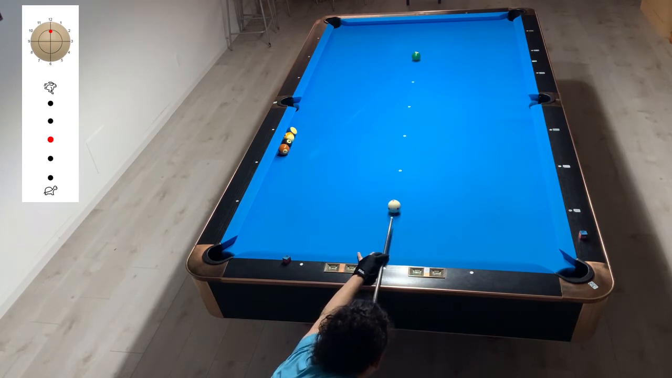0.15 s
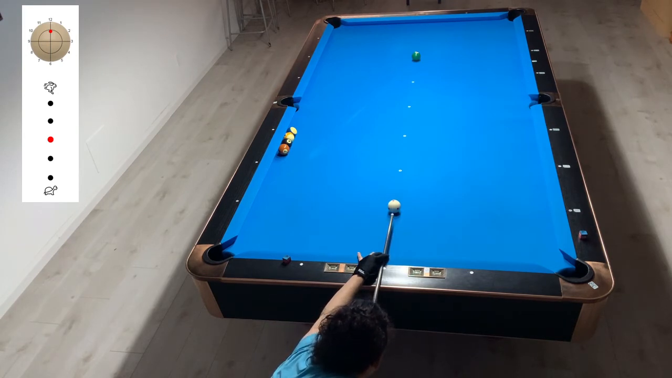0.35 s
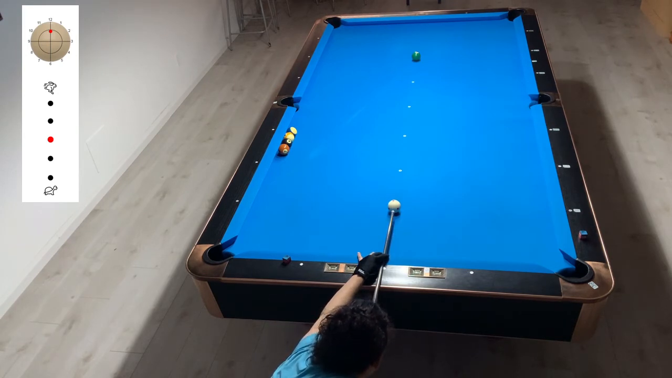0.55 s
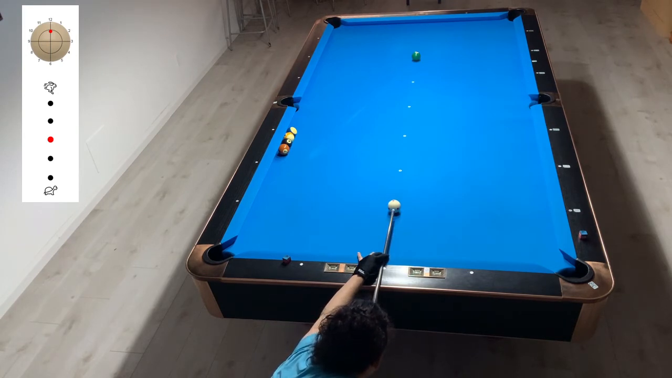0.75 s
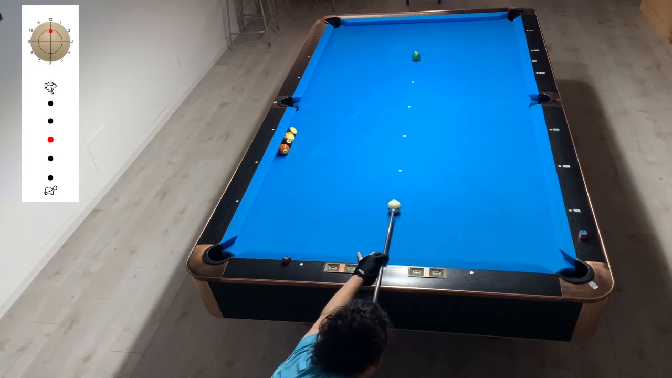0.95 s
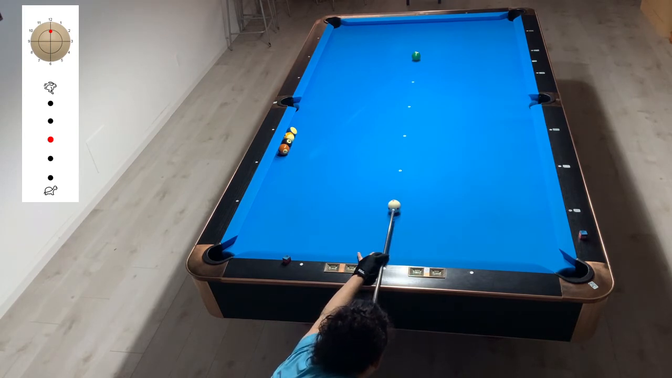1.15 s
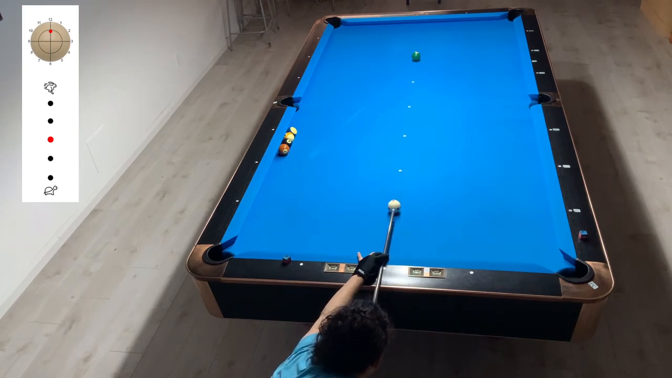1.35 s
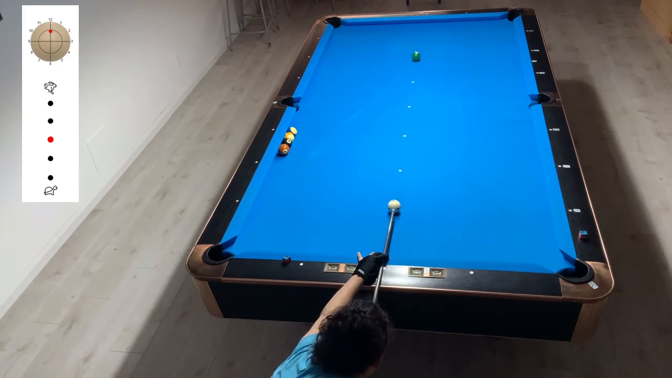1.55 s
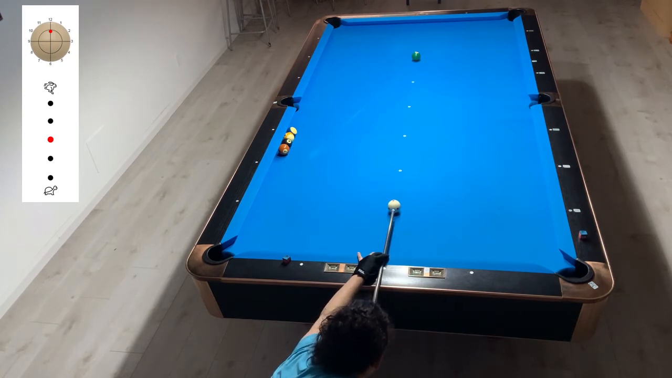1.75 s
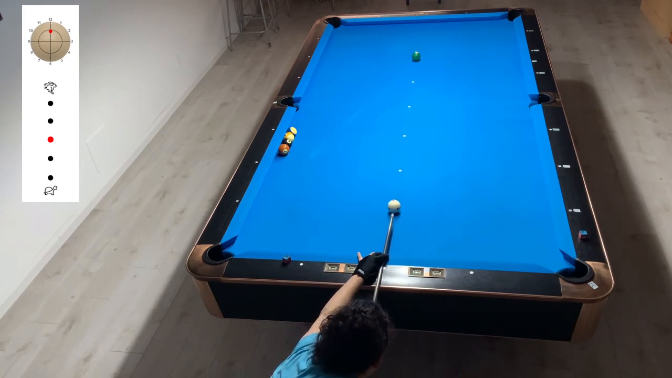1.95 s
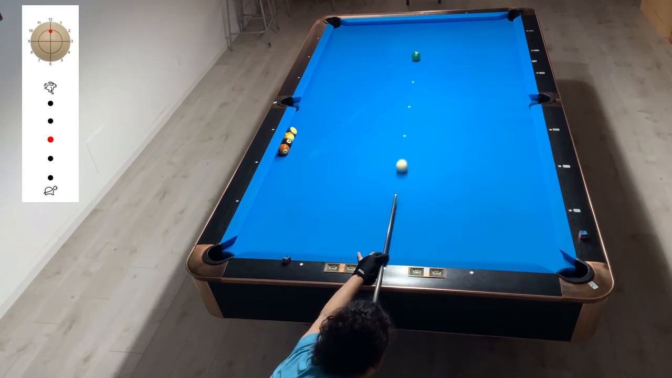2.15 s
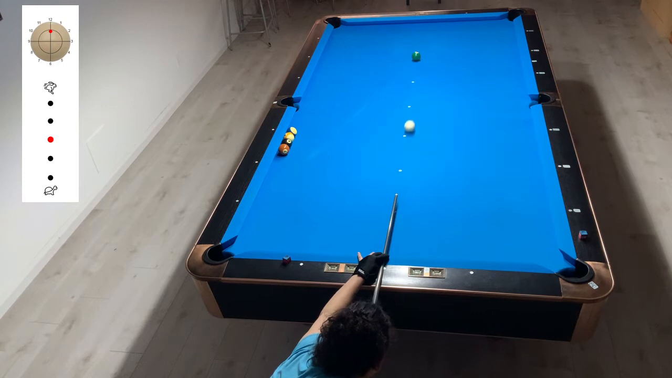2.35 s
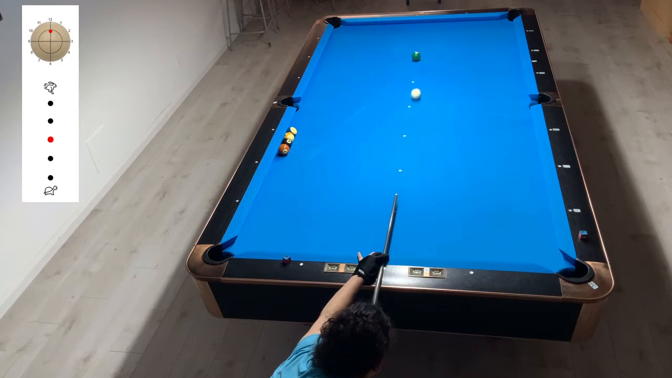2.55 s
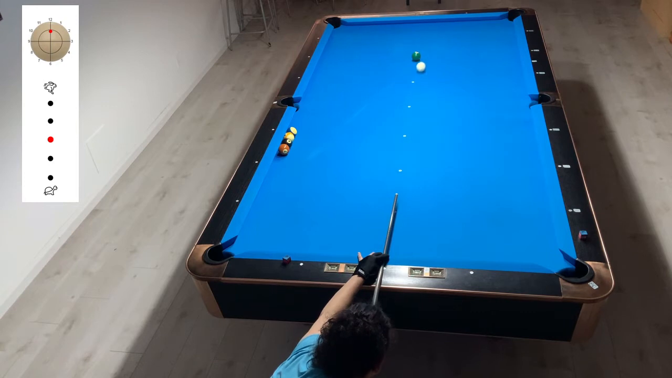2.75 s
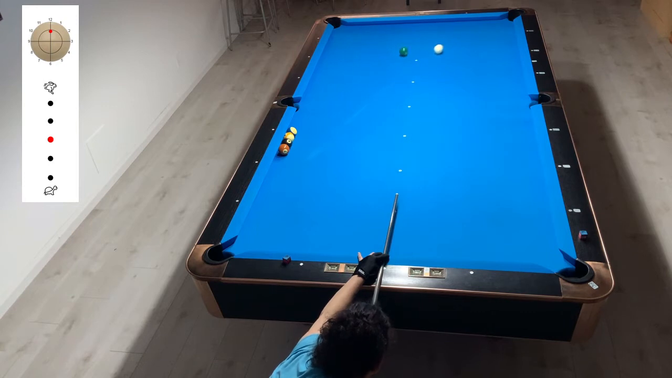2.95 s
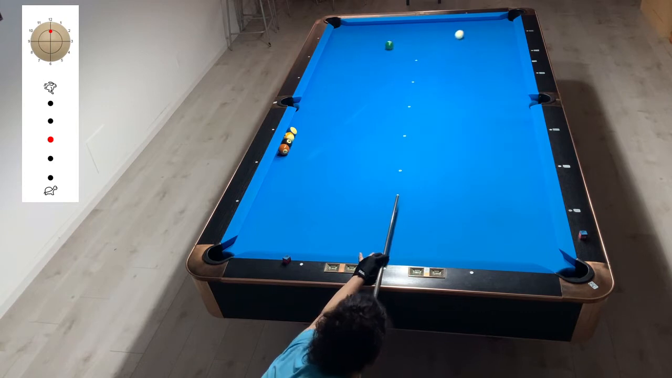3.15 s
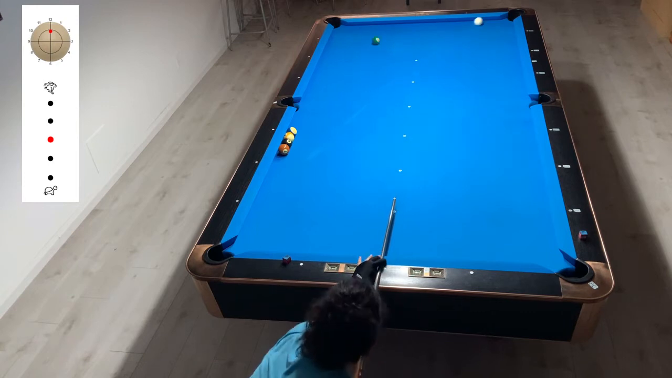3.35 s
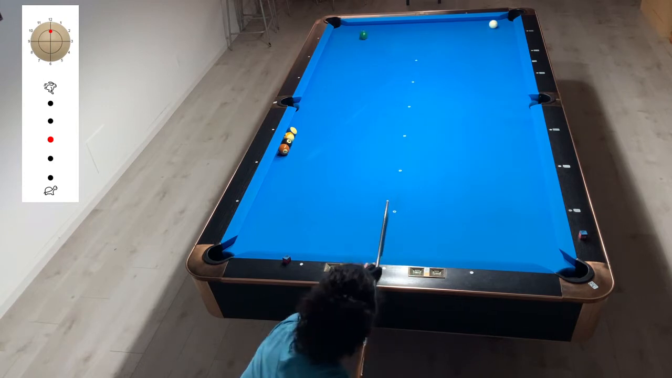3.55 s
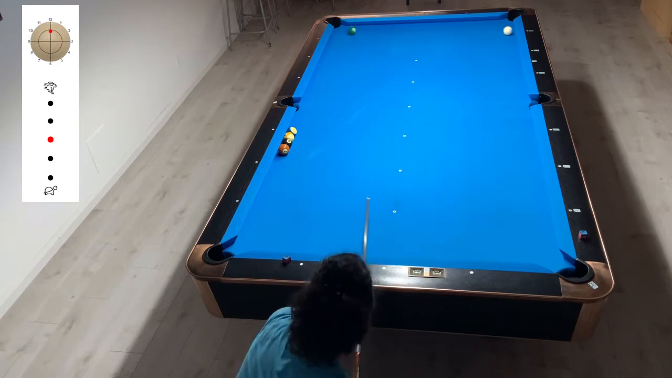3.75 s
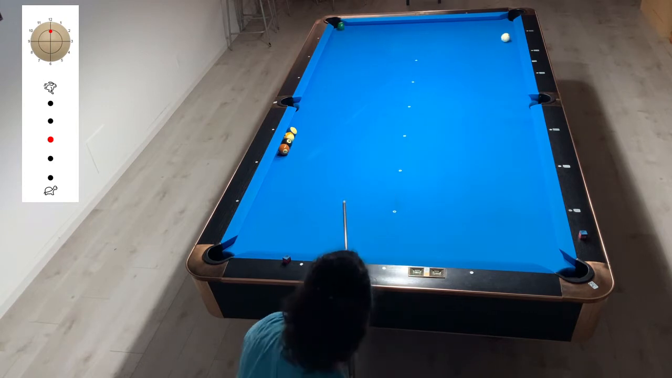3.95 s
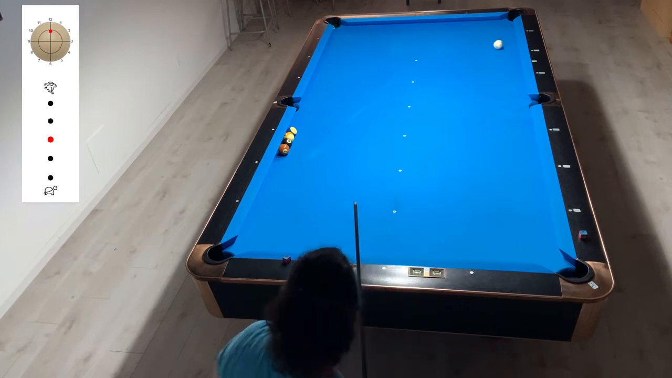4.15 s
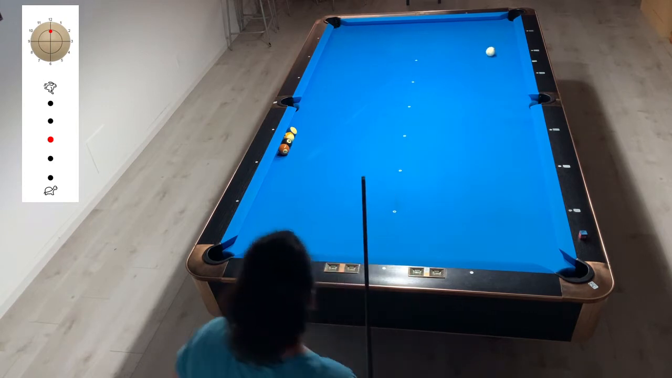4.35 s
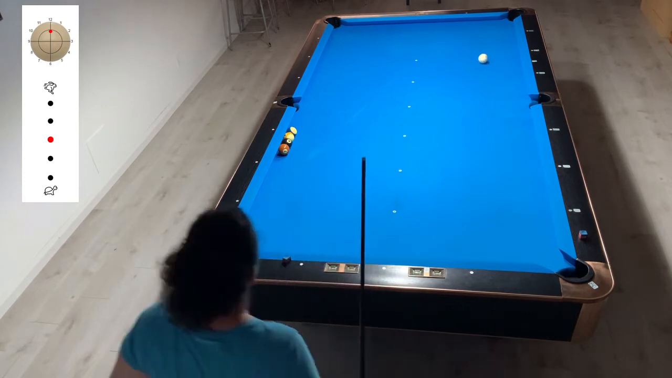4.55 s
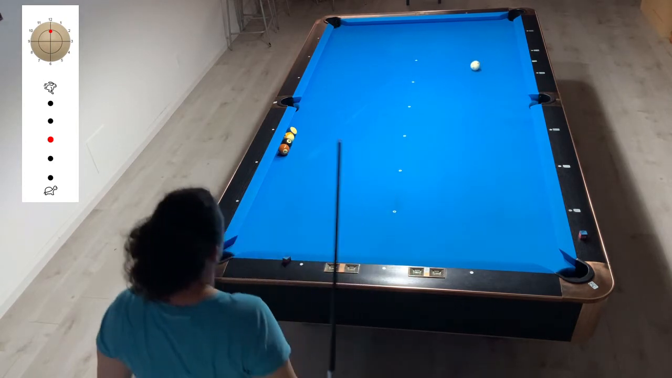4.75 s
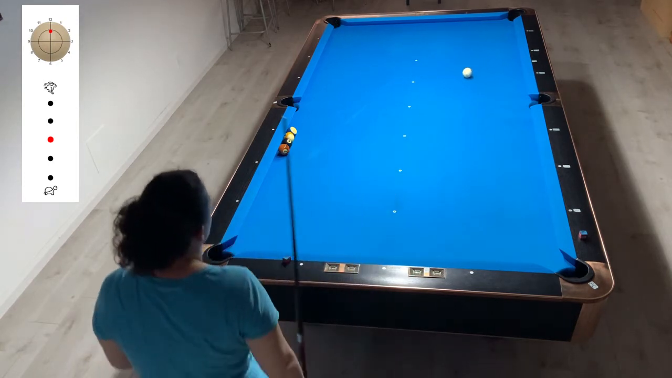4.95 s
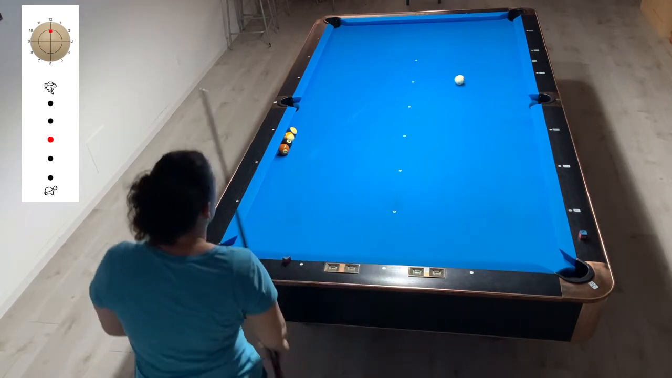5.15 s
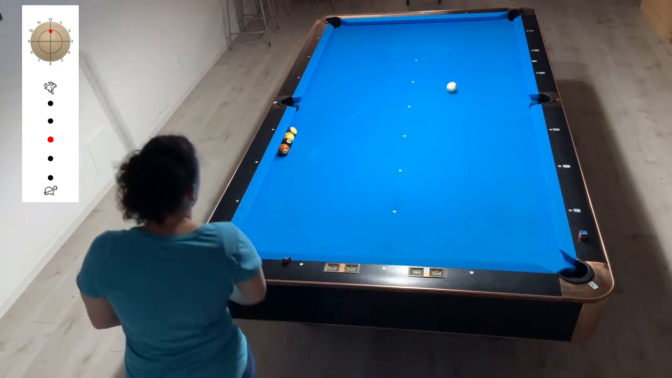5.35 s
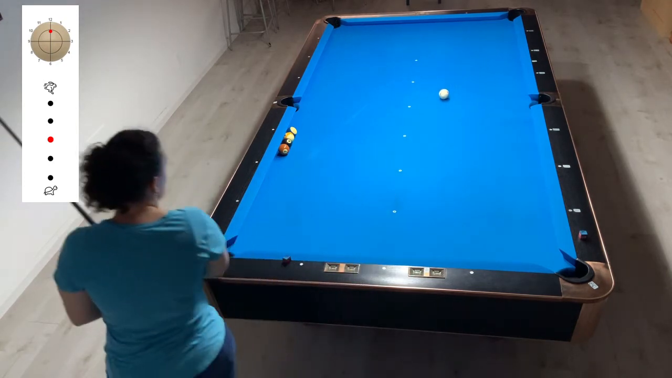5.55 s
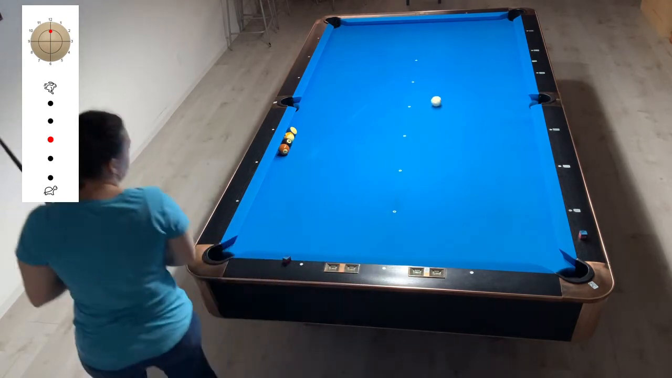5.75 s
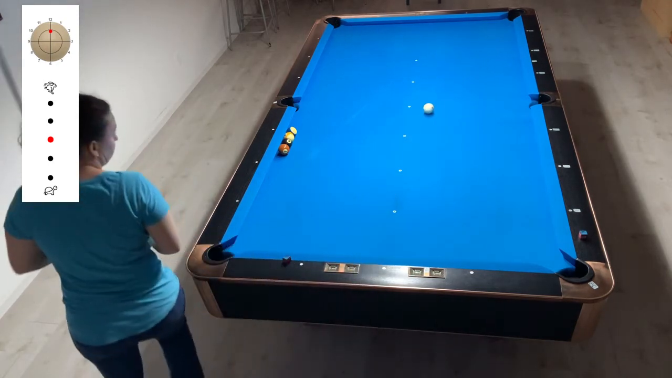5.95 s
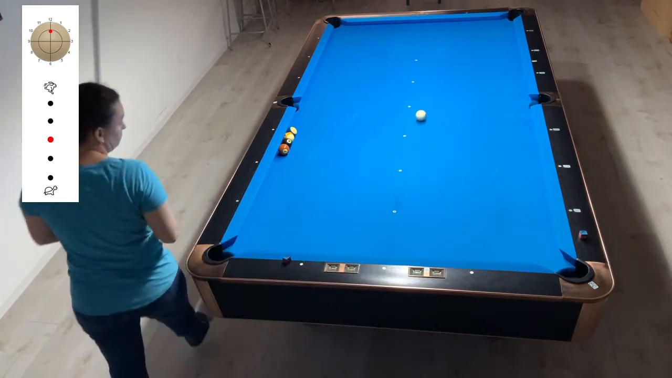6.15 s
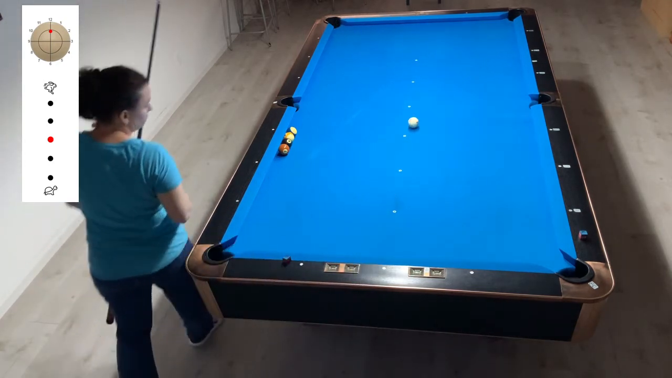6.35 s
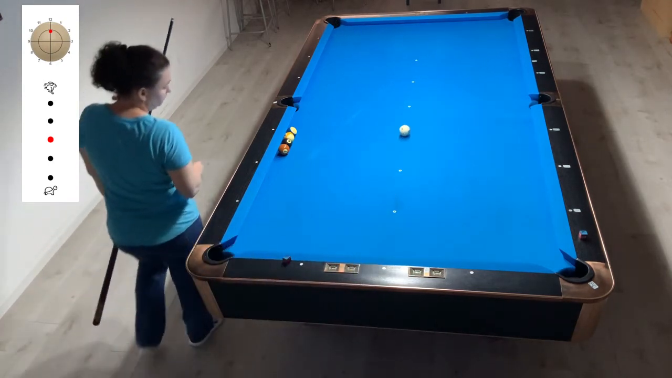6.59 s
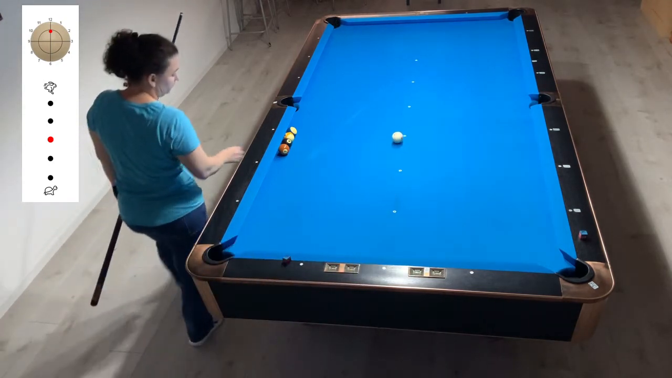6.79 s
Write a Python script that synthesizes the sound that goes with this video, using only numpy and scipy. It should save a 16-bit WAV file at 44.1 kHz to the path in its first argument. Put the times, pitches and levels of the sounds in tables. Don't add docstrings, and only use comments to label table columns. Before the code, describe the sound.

A bare hard-walled room with low, soft air tone and faint hiss, heard by close stereo microphones. For the first two seconds only barely audible cloth and glove rubs. At 2.02 a loud, short woody cue knock, tip tick and shaft ringing briefly, with a low table hum beneath. At 2.87 a hard, clean ball-on-ball click, farther away, with quick wall reflections and a short tail. Faint rumble and rustle follow, with a weak dull bump near 3.45 and a small rub and squeak around 3.8-4.1. From 4.26 to 4.7 a ball drops: irregular rapid clacks, bright pings and hollow wooden knocks around mid-low pitch, strongest near 4.3 and 4.51, over a heavy low hum. Then sparse muffled bumps, a light knock at 5.37, a tiny bright snap at 5.65, and a brief low squeak at 6.22, amid clothing rustle and shoe scuffs until about 6.9.

```python
import sys
import numpy as np
from scipy import signal
from scipy.fft import rfft, irfft, next_fast_len
from scipy.io import wavfile
from scipy.ndimage import uniform_filter1d

SR = 44100
rng = np.random.default_rng(int(sys.argv[2]) if len(sys.argv) > 2 else 0)


def ratio(d):
    e = np.asarray(d, float) / 20
    return 10 ** e


def int16_out(signal):
    q = np.round(np.clip(np.atleast_2d(signal).T, -1, 1) * 32767)
    wavfile.write(sys.argv[1], SR, q.astype(np.int16))


N = 300894

# (frequency [Hz], level per Hz [dB])
AIR = [(18, -51.5), (34, -14.5), (54, -0.5), (75, -0.5), (92, -11.5), (122, -3.5), (283, -14), (318, -17),
       (441, -10.5), (507, -17.5), (672, -13), (1100, -26), (2060, -35.5), (8000, -61.5), (10400, -75),
       (17600, -120)]
AIR_DB, HISS_DB = -61.5, -85.5

# (delay [s], level [dB])
ECHOES = [(.0042, -6), (.0072, -6), (.0092, -21.5), (0.0123, -8), (0.0168, -27), (0.0285, -35.5),
          (.0288, -23), (.033, -13)]
# (delay [s], level [dB])
FAR_ECHOES = [(.0042, -1), (.0072, -5), (.0092, -3), (0.0118, -7), (0.0262, -15), (0.0291, -12),
              (0.034, -11), (.0358, -11), (.0585, -15), (.062, -13)]
FAR_WALL_S, FAR_WALL_DB = 0.016, -0.5
# (frequency [Hz], t60 [s])
HALL_T60 = [(150, 1.2), (500, 0.53), (1700, 0.72), (2700, 0.53), (3900, 0.55), (5400, 0.52), (9000, 0.28),
            (14000, 0.21)]
# (frequency [Hz], likeness [0-1])
PORT_LIKENESS = [(60, 0.87), (200, 0.92), (400, 0.56), (800, 0.2), (2000, 0.029), (6000, 0.06),
                 (7600, 0.12), (9650, 0.19), (11500, 0.18), (13000, 0.7)]
# (frequency [Hz], share of left copied into right [0-1])
COPIED = [(6000, 0), (8000, .5), (9100, .85), (9650, .97), (10200, .85), (11500, .3), (13000, .8),
          (15000, .5)]
PORT_LAG = 6.85

# (frequency [Hz], width [Hz], level [dB])
BED_MODES = [(115.7, 6.7, 8), (147.8, 6.6, 3.5), (180, 12, -2), (199.1, 3.9, -9.5), (253, 36, -13)]
# (start [s], length [s], level [dB], frequency [Hz])
HUMS = [(2.061, 0.15, -37.9, 66.1), (2.04, 0.34, -35.5, 60.6), (2.203, 0.26, -46.5, 69.5),
        (2.493, 0.25, -38, 63.6), (2.776, 0.17, -41.5, 68.5), (2.883, 0.4, -36.5, 66.14),
        (2.897, 0.23, -40.5, 60.15), (3.31, 0.17, -47, 65.6), (3.454, 0.43, -46, 66.03),
        (3.46, 0.73, -57, 60.7), (3.914, 0.24, -57.8, 69.8), (4.298, 0.52, -33, 59.46),
        (4.38, 0.43, -41, 70.3), (4.85, 0.29, -45.5, 58.65), (4.851, 0.36, -51.5, 71.5),
        (5.33, 0.41, -54.5, 68.56), (5.469, 0.33, -50, 60.46), (5.618, 0.34, -54, 66.7),
        (5.971, 0.29, -51.5, 68.5), (6.078, 0.33, -57, 60.2), (6.441, 0.26, -50, 67.6),
        (6.533, 0.27, -54.5, 58.6), (2.52, 0.11, -46, 59.3), (3.15, 0.091, -35, 64),
        (3.56, 0.13, -49, 61.8), (3.72, 0.12, -64, 70)]
HUM_RISE_S, HUM_FALL_S, HUM_SAG_DB = 0.053, 0.051, -4.5
# (time [s], second mode [dB], upper modes [dB])
JOLTS = [(2.037, -44.5, -40), (2.32, -61.5, -58), (2.559, -57, -61), (2.88, -49.5, -43), (3.2, -65, -54.5),
         (3.449, -49, -49.5), (3.8, -61, -56.5), (4.298, -30.5, -29.5), (4.55, -38.5, -65),
         (4.72, -47, -48.5), (5.37, -57, -49), (5.5, -58, -62), (6.05, -63, -77), (6.26, -64, -66),
         (6.56, -60, -62)]
SECOND_HZ = 96.7
JOLT_RISE_S, SECOND_T60_S, UPPER_T60_S = 0.019, 0.99, 1

# (frequency [Hz], level [dB])
RUMBLE = [(200, -22.5), (350, -6), (520, -3.5), (750, -6.5), (1100, -11)]
SCUFF = [(700, -18.5), (1200, 5), (2300, -0.5), (3200, -9), (4200, -15)]
RUSTLE = [(2800, 1.5), (4000, 0), (5000, -2), (6500, -6), (8500, -16.5)]
SWISH = [(6000, -9), (8000, 3), (10000, 7.5), (13500, -1.5), (15300, -1), (16000, -5)]
# (time [s], level over stillness [dB])
BUSY = [(0, 0.5), (2.0, 1.5), (2.302, 0.5), (3.3, 7.5), (3.5, 8.5), (4.2, 6), (4.75, 10.5), (4.9, 10),
        (5.55, 10), (5.82, 7), (6.1, 12.5), (6.5, 6), (6.82, 7.5)]
# (start [s], length [s], strength [dB], brightness [dB], share spent swelling [0-1])
MOVES = [(0.412, 0.26, -73.5, 2.5, 0.19), (1.1, 0.11, -77, 4, 0.26), (1.40, 0.33, -75, 0.5, 0.22),
         (1.87, 0.35, -65.5, 5.5, 0.7), (2.42, 0.25, -73, -5, 0.26), (3.298, 0.28, -74, 5.5, 0.72),
         (3.798, 0.31, -65.5, 9.5, 0.68), (4.046, 0.52, -63.5, 5, 0.05), (4.902, 0.34, -62, 2, 0.3),
         (4.98, 0.4, -64.5, 2.5, 0.33), (5.315, 0.09, -70, 6.5, 0.3), (5.375, 0.26, -66, -3, 0.46),
         (5.466, 0.31, -62.5, 2.5, 0.38), (5.637, 0.26, -62.5, 5, 0), (5.842, 0.25, -66, 2.5, 0.4),
         (5.983, 0.43, -62.5, 1.5, 0.23), (6.116, 0.34, -65.5, 3.5, 0.44), (6.297, 0.31, -68, 6, 0.22),
         (6.538, 0.38, -62, 1.5, 0.28)]
STILL_DB = (-74.5, -84, -90.5, -100)
BUSY_SHARE = (1.145, 1.33, .8, 1.64)
MOVE_DB = (-8, -1.5, -14, -33)
BRIGHT_SHARE = (-2, 0, 1.5, 3.5)
SHARPNESS = (0.93, 0.94, 1, 2)
# (start [s], length [s], level [dB], frequency [Hz])
RUBS = [
    (0.425, 0.087, -81, 4600),
    (1.415, 0.14, -75.5, 2270),
    (2.392, 0.17, -72.5, 2390),
    (3.839, 0.25, -65, 2860),
    (4.074, 0.037, -53.5, 1660),
    (5.377, 0.12, -61.5, 2720),
    (5.889, 0.42, -74, 4800),
    (6.219, 0.036, -60, 1800),
    (6.56, 0.067, -74, 3420),
]
RUB_WIDTH = 0.069

# (time [s], peak [dB], room send [dB])
SNAPS = [
    (5.637, -60, 10),
    (5.649, -49, 0),
    (6.427, -74, -13),
]
# (frequency [Hz], level [dB])
SNAP_TICK = [(1000, -46), (2900, 8), (3600, -9), (4400, 4), (6000, -11), (9000, -7), (12000, -8),
             (15300, -8.5), (16000, -19.5)]

# (time [s], box [dB], thud [dB], pitch factor [ratio])
BUMPS = [(3.450, -64, -44.5, 0.87), (3.767, -59, -60, 0.72), (4.268, -44, -37, 0.93),
         (4.308, -26.5, -44, 0.99), (4.385, -40.5, -34, 1.05), (4.455, -41, -32, 1.11),
         (4.522, -33, -36, 1.01), (4.599, -46, -53, 0.85), (5.0564, -54, -58, 0.9),
         (5.411, -48.5, -48, 0.76), (5.5506, -42, -60, 0.845), (5.5974, -49.5, -64, 0.71),
         (5.8559, -51.5, -72, 0.96), (5.93, -53.5, -65, 0.96), (6.0657, -48.5, -58, 0.95),
         (6.2225, -56, -52, 0.81)]
# (time [s], peak [dB], frequency [Hz], t60 [s])
PLANKS = [(4.262, -36.5, 626, 0.096), (4.262, -35.5, 430, 0.11), (4.336, -29, 570, 0.065),
          (4.340, -28, 376, 0.062), (4.325, -37, 452, .08), (4.380, -33.5, 444, 0.083),
          (4.402, -39.5, 392, 0.036), (4.452, -37, 557, .08), (4.485, -41, 400, 0.041),
          (4.548, -34.5, 537, 0.072), (4.562, -43, 430, .07), (4.588, -38, 496, 0.06),
          (4.636, -37, 534, 0.04), (4.675, -43, 436, 0.029), (4.72, -48, 505, 0.038),
          (4.30, -44, 680, 0.029), (4.306, -24.5, 534, .09), (4.518, -27.5, 538, 0.11),
          (4.345, -30.5, 148, .06), (3.455, -54, 386, 0.093), (3.48, -49.5, 227, 0.11),
          (3.51, -52.5, 310, .12)]
# (time [s], peak [dB], frequency [Hz], t60
# [s])
PINGS = [(4.089, -54.5, 1610, 0.018), (4.2585, -41.5, 1990, 0.026), (4.2956, -33.5, 1236, .02),
         (4.2956, -34, 2680, .018), (4.3215, -37, 2890, 0.017), (4.348, -33, 1220, 0.014),
         (4.348, -45, 2480, 0.013), (4.5118, -31, 2630, 0.021), (4.5125, -40, 3780, 0.01),
         (4.5125, -35.5, 2000, 0.01), (4.563, -43, 2600, 0.029), (4.577, -42, 2700, .025),
         (4.580, -41, 1243, 0.032), (4.639, -40, 1970, 0.013), (4.666, -50, 2670, 0.024),
         (5.370, -48.5, 3790, 0.01), (5.370, -53, 2600, .015), (2.8715, -26.5, 2700, 0.029)]
PING_RISE_S, PLANK_RISE_S = 0.00039, 0.0038
# (frequency [Hz], level [dB], t60 [s])
BOX_MODES = [(407, -19.5, 0.074), (466, -3.5, 0.05), (520, 5.5, 0.038), (637, -34, 0.05)]
# (time [s], rap [dB], clack [dB], box [dB], thud [dB])
KNOCKS = [(4.09, -72.5, -44.5, -64, -82), (4.2593, -38, -43, -38, -45.5), (4.2952, -30.5, -37, -34.5, -56),
          (4.324, -68, -27.5, -38, -58), (4.348, -34.5, -35, -47, -12), (4.414, -48, -34.5, -39.5, -42),
          (4.5121, -43.5, -21.5, -39.5, -33.5), (4.575, -75, -39, -43, -58),
          (4.6373, -67, -31, -45.5, -36.5), (4.68, -77, -41, -50.5, -52), (5.3703, -69, -38, -48.5, -62)]
# (frequency [Hz], level [dB])
RAP_TICK = [(700, -4.5), (1300, 1.5), (1600, -3), (2300, -3), (3400, -14.5), (6000, -19), (9600, -17),
            (13200, -25), (15700, -28)]
CLACK_TICK = [(600, -7), (900, -3), (1260, 1), (1550, -2), (1800, 2.5), (2700, -1), (3100, -5), (3900, -11),
              (5000, -25), (8000, -37)]
THUD_TICK = [(90, -2), (130, 3), (200, -3.5), (330, -5), (600, -3)]

# (time [s], peak [dB], room send [dB])
BALLS = [
    (2.8658, -13.5, -7),
]
# (frequency [Hz], level [dB])
BALL_TICK = [(250, -25.5), (383, -7), (560, -17.5), (1100, -6.5), (2170, 1), (2900, -3.5), (3600, -12.5),
             (4300, -28), (4650, -38.5), (6100, -35.5), (7500, -63), (15700, -47)]
# (time [s], peak [dB], room send [dB])
BALL_RING = [
    (2.866, -42, -2),
]
# (frequency [Hz], level [dB], t60 [s])
BALL_MODES = [(8360, -11, 0.014), (10840, -6, 0.01), (11670, -10, 0.0095), (12960, -7, .012),
              (13800, 0, 0.008), (14400, -4, 0.015), (15100, 0, 0.011)]

# (time [s], peak [dB], room send [dB])
CUE = [
    (2.0191, -13.5, -15.5),
]
# (frequency [Hz], level [dB], t60 [s])
CUE_MODES = [(363, 1, 0.045), (569, -1, 0.062), (764, 2.5, 0.054), (1114, 7.5, 0.03), (1133, 1.5, 0.046),
             (1316, 2.5, 0.052), (1740, -10.5, 0.16), (1916, -1.5, 0.067), (1894, -8, 0.025),
             (2276, -6, 0.095), (2700, -3.5, 0.044), (2847, 4.5, 0.02), (3240, -6, 0.025),
             (3460, -7, 0.017)]
# (time [s], peak [dB], room send [dB])
TIP = [
    (2.02, -21.5, 1.24),
]
# (frequency [Hz], level [dB])
TIP_TICK = [(260, 2.5), (500, 5.5), (800, -2), (1150, 2), (1500, -8), (1750, 2), (2200, -5.5), (2680, -2.5),
            (3100, -15.5), (3700, -19.5), (4500, -23), (7000, -25), (12500, -16), (15700, -36)]


def evened(x):
    return x / np.sqrt(np.mean(x ** 2) + 1e-20)


def read(points, hz):
    f, value = np.transpose(points)
    return np.interp(np.log(hz + 1), np.log(f + 1), value)


def edged(points):
    return [(points[0][0] / 2, -70)] + list(points) + [(points[-1][0] * 2, -70)]


def add(mix, s, sound):
    part = mix[round(s * SR):][:len(sound)]
    part += sound[:len(part)]


def tick(points, size=4096):
    hz = abs(np.fft.fftfreq(size, 1 / SR))
    log_gain = np.log(ratio(read(edged(points), hz)))
    pulse = np.fft.ifft(np.exp(np.conj(signal.hilbert(log_gain)))).real[:size // 2]
    return pulse / abs(pulse).max()


def ring(modes, rise):
    t = np.arange(SR // 4) / SR
    y = sum(ratio(db - 60 * t / t60) * np.sin(2 * np.pi * hz * t) for hz, db, t60 in modes)
    y = y * (1 - np.exp(-t / rise))
    return y / abs(y).max()


def ring_each(rows, rise):
    out = np.zeros(N)
    for s, db, hz, t60 in rows:
        add(out, s, ratio(db) * ring([(hz, 0, t60)], rise))
    return out


def strike(times, levels_db, sound, chatter=0):
    train = np.zeros(N)
    np.add.at(train, np.round(np.asarray(times) * SR).astype(int), ratio(levels_db))
    trail = signal.lfilter([0, chatter], [1, -np.exp(-1 / (SR * 0.0037))], train)
    trail = trail * rng.standard_normal(N)
    return signal.oaconvolve(train + trail, sound)[:N]


def contact(times, levels_db, room_db, sound, chatter=0):
    direct = strike(times, levels_db, sound, chatter)
    return np.array([direct, strike(times, levels_db + room_db, sound)])


def noise(points, patchy_db=0, size=512):
    hz = np.fft.rfftfreq(size, 1 / SR)
    a, b, c, d, patch = rng.standard_normal((N // (size // 4) + 5, len(hz), 5)).T
    patch = uniform_filter1d(patch, size=7, axis=0)
    patch = evened(uniform_filter1d(patch, size=14, axis=1))
    gain = ratio(read(points, hz)[:, None] + patchy_db * patch)
    z = np.array([a + 1j * b, c + 1j * d]) * gain
    return evened(signal.istft(z, nperseg=size, noverlap=size * 3 // 4)[1][:, :N])


def port_turn(count):
    return 2 * np.pi * np.fft.rfftfreq(count) * PORT_LAG


def spread(pair):
    count = pair.shape[1]
    size = next_fast_len(count)
    left, other = rfft(pair, size, axis=1)
    same = np.clip(read(PORT_LIKENESS, np.fft.rfftfreq(size, 1 / SR)), 0, 1)
    trail = np.exp(-1j * np.minimum(port_turn(size), 2 * np.pi))
    right = trail * same * left + np.sqrt(1 - same ** 2) * other
    return irfft([left, right], size, axis=1)[:, :count]


def echoes(x, table):
    taps = np.zeros((2, SR // 10))
    taps[:, 0] = 1
    for k, (s, db) in enumerate(table):
        shift = min(k, 1) * rng.integers(-5, 6, 2)
        taps[[0, 1], round(s * SR) + shift] = ratio(db) * rng.uniform(0.7, 1, 2)
    return signal.oaconvolve(x[None], taps, axes=1)[:, :N]


def hall(x, build=0.0032):
    taps = np.zeros((2, SR))
    slots = np.arange(0, SR - 16, 16)
    at = slots + rng.integers(0, 16, (2, len(slots)))
    np.put_along_axis(taps, at, rng.choice([-1., 1.], at.shape), 1)
    hz, t, z = signal.stft(spread(taps), SR, nperseg=128)
    decay = ratio(-60 * t / read(HALL_T60, hz)[:, None])
    tail = signal.istft(z * decay, SR, nperseg=128)[1][:, :SR]
    tail = tail * (1 - np.exp(-(np.arange(SR) / SR / build) ** 2))
    tail = ratio(6.0) * tail / np.linalg.norm(tail[0])
    return signal.fftconvolve(x[None], tail, axes=1)[:, :N]


def still_air():
    return ratio(AIR_DB) * noise(AIR, patchy_db=3.0, size=4096)


def hiss():
    colour = [(3000, -5.5), (6000, 2.0), (10000, 4.5), (13500, -1.0), (15700, -3.0)]
    return ratio(HISS_DB) * noise(colour)


def bed_hum():
    hum = np.zeros(N)
    for s, length, db, hz in HUMS:
        u = np.arange(0, length + HUM_FALL_S, 1 / SR)
        edge = np.clip(np.minimum(u / HUM_RISE_S, (length + HUM_FALL_S - u) / HUM_FALL_S), 0, 1)
        level = ratio(db + HUM_SAG_DB * u / length) * np.sin(np.pi / 2 * edge) ** 2
        add(hum, s, level * np.sqrt(2) * np.sin(2 * np.pi * hz * u))
    return hum


def jolt_level(times, levels_db, t60):
    u = np.arange(SR) / SR
    swell = (1 - np.exp(-(u / JOLT_RISE_S) ** 2)) * 1000 ** (-u / t60)
    return np.sqrt(abs(strike(times, 2 * levels_db, swell ** 2)))


def bed_jolts():
    s, second_db, upper_db = np.transpose(JOLTS)
    tone = np.sqrt(2) * np.sin(2 * np.pi * SECOND_HZ * np.arange(N) / SR)
    second = jolt_level(s, second_db, SECOND_T60_S) * tone
    size = next_fast_len(N)
    hz = np.fft.rfftfreq(size, 1 / SR)
    shape = sum(ratio(db) / (1 + (2 * (hz - mode_hz) / width) ** 2) for mode_hz, width, db in BED_MODES)
    resonant = irfft(rfft(rng.standard_normal((2, size))) * shape, size)[:, :N]
    return second + jolt_level(s, upper_db, UPPER_T60_S) * evened(spread(resonant))


def stir():
    busy_db = np.interp(np.arange(N) / SR, *np.transpose(BUSY))
    power = ratio(np.array(STILL_DB)[:, None] + np.outer(BUSY_SHARE, busy_db)) ** 2
    for s, length, db, bright_db, peak in MOVES:
        peak = np.clip(peak, 0.05, 0.95)
        u = np.arange(0, 1, 1 / (length * SR))
        swell = np.sin(np.pi / 2 * np.minimum(u / peak, (1 - u) / (1 - peak))) ** 2
        levels_db = db + np.array(MOVE_DB) + np.array(BRIGHT_SHARE) * bright_db
        for layer, sharp, layer_db in zip(power, SHARPNESS, levels_db):
            add(layer, s, (ratio(layer_db) * swell ** sharp) ** 2)
    layers = (noise(edged(RUMBLE), patchy_db=3), noise(edged(SCUFF), patchy_db=1.5),
              noise(edged(RUSTLE), patchy_db=1.2), noise(edged(SWISH), patchy_db=1.2))
    return sum(np.sqrt(level) * layer for level, layer in zip(power, layers))


def rubs():
    out = np.zeros((2, N))
    for s, length, db, hz in RUBS:
        edges = [hz * (1 - RUB_WIDTH), hz * (1 + RUB_WIDTH)]
        band = signal.butter(2, edges, "band", fs=SR, output="sos")
        swell = np.hanning(round(length * SR))
        rub = evened(signal.sosfilt(band, rng.standard_normal((2, SR // 2))))[:, :len(swell)]
        add(out.T, s, (ratio(db) * swell * rub).T)
    return out


def snaps():
    return contact(*np.transpose(SNAPS), tick(SNAP_TICK), 0.3)


def return_bumps():
    dull, thud = np.zeros(N), tick(THUD_TICK)
    for s, box_db, thud_db, pitch in BUMPS:
        box = ring([(hz * pitch, db, t60) for hz, db, t60 in BOX_MODES], rise=0.0065)
        add(dull, s, ratio(box_db) * box)
        add(dull, s, ratio(thud_db) * thud)
    return np.array([dull, ratio(-8.5) * dull])


def return_planks():
    return ring_each(PLANKS, PLANK_RISE_S)


def bright_pings():
    pings = ring_each(PINGS, PING_RISE_S)
    return np.array([pings, ratio(-11.5) * pings])


def pocket_knocks():
    s, rap_db, clack_db, box_db, thud_db = np.transpose(KNOCKS)
    return (contact(s, rap_db, 9.5, -tick(RAP_TICK), 0.2)
            + contact(s, clack_db, -1.5, tick(CLACK_TICK), 0.07)
            + contact(s, box_db, 0, ring(BOX_MODES, rise=0.0021))
            + contact(s, thud_db, -21, tick(THUD_TICK)))


def ball_ring():
    return contact(*np.transpose(BALL_RING), ring(BALL_MODES, rise=0.0005))


def ball_click():
    s, db, room_db = np.transpose(BALLS)
    click = tick(BALL_TICK)
    direct, sent = contact(s, db, room_db, click)
    return direct, sent + strike(s + FAR_WALL_S, db + FAR_WALL_DB, click)


def cue_shot():
    shaft = contact(*np.transpose(CUE), ring(CUE_MODES, rise=0.003))
    return shaft + contact(*np.transpose(TIP), tick(TIP_TICK), 0.15)


def blows():
    near, near_sent = (snaps() + return_bumps() + bright_pings() + pocket_knocks()
                       + ball_ring() + cue_shot())
    far, far_sent = ball_click()
    planks = return_planks()
    tail = hall(near_sent + far_sent + ratio(-14.0) * planks)
    planks_left_of_centre = planks * ratio([[1.5], [-1.5]])
    return echoes(near, ECHOES) + echoes(far, FAR_ECHOES) + tail + planks_left_of_centre


def scene():
    diffuse = spread(still_air() + hiss() + stir() + rubs())
    return diffuse + bed_hum() + bed_jolts() + blows()


def shared_treble(pair):
    size = next_fast_len(N)
    left, right = rfft(pair, size, axis=1)
    copied = np.clip(read(COPIED, np.fft.rfftfreq(size, 1 / SR)), 0, 1)
    trail = np.exp(-1j * np.maximum(port_turn(size) - 2 * np.pi, 0))
    late_right = irfft((copied * left + (1 - copied) * right) * trail, size)[:N]
    return np.array([pair[0], late_right])


def smeared(x):
    rise = np.linspace(0, 1, 1000)
    band = signal.butter(2, [900, 7500], "band", fs=SR, output="sos")
    grain = signal.sosfilt(band, rng.standard_normal(len(rise))) * rise
    grain = grain[None] / np.linalg.norm(grain)
    lead = signal.oaconvolve(x, grain, axes=1)[:, len(rise) - 1:]
    return x + ratio(-25.0) * lead


def low_pass(x):
    return signal.sosfilt(signal.butter(12, 15780, fs=SR, output="sos"), x)


def record(dry):
    bass_cut = signal.butter(2, 36, "high", fs=SR, output="sos")
    mix = signal.sosfilt(bass_cut, smeared(shared_treble(dry)))
    mix = signal.oaconvolve(mix, signal.firwin(255, 15700, fs=SR)[None], "same")
    return low_pass(mix)


dry = scene()
out = record(dry)
int16_out(out)
```